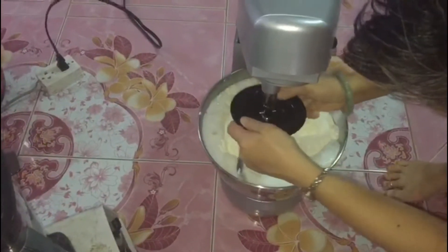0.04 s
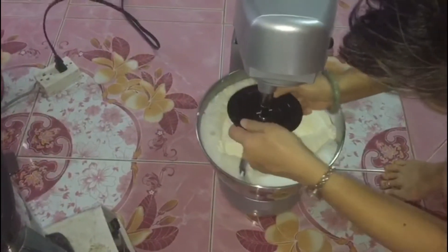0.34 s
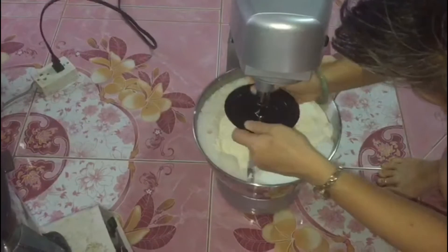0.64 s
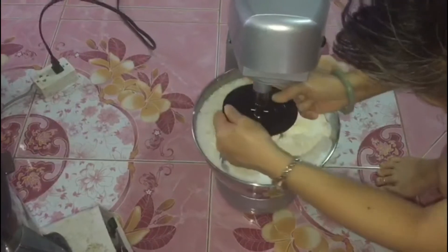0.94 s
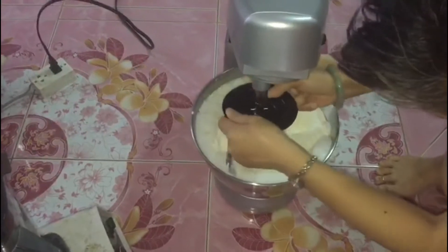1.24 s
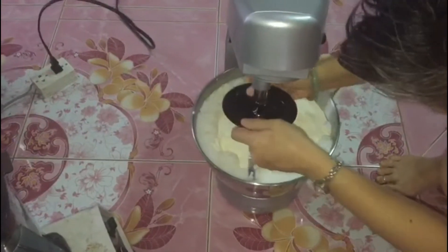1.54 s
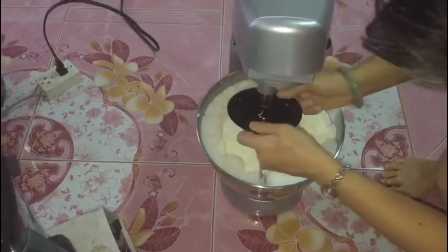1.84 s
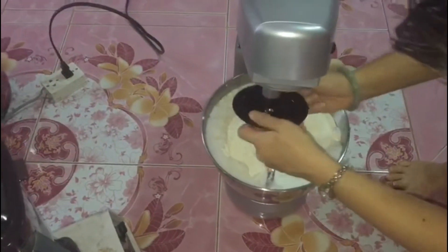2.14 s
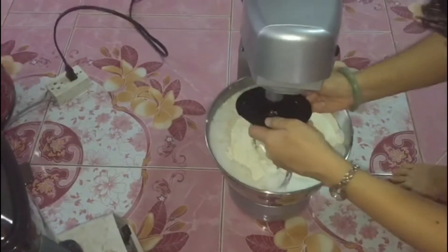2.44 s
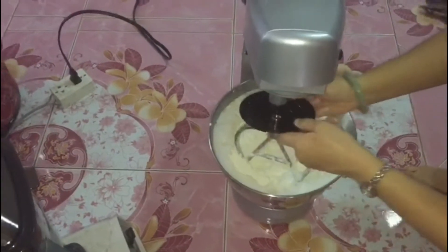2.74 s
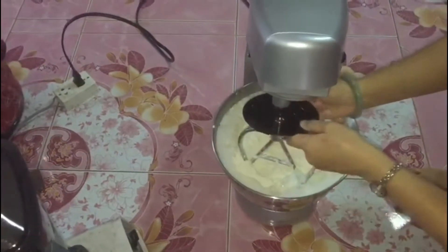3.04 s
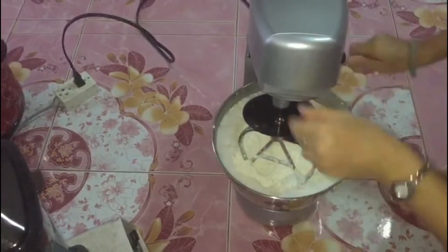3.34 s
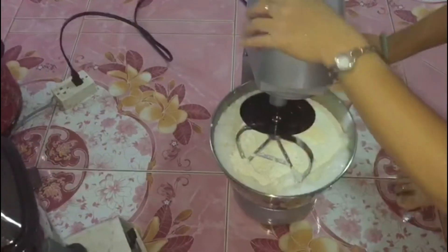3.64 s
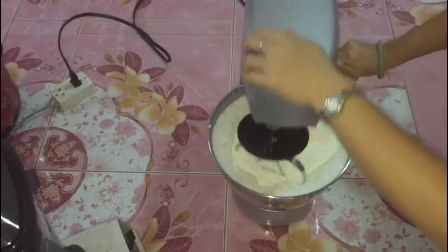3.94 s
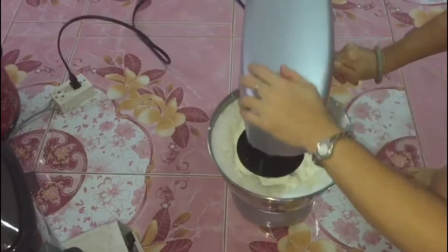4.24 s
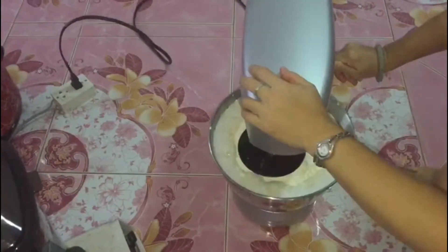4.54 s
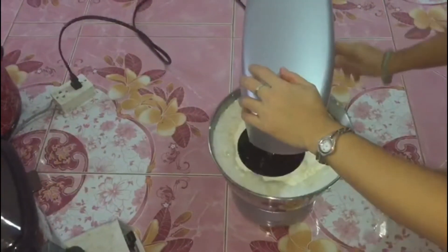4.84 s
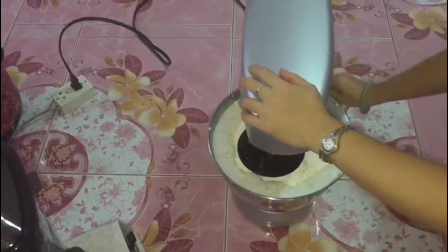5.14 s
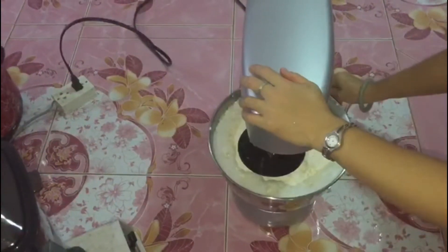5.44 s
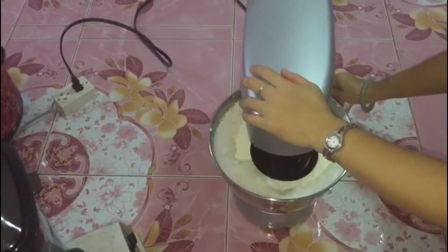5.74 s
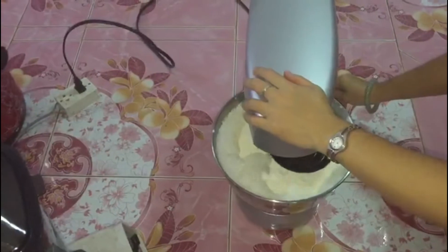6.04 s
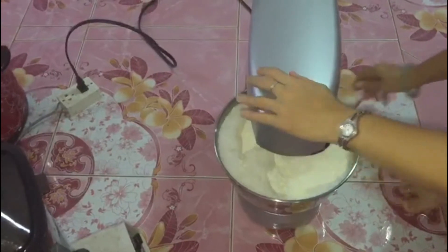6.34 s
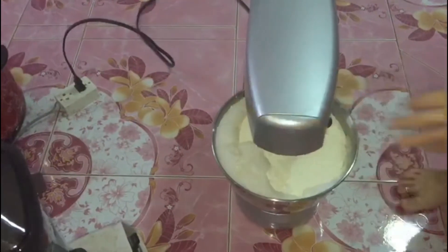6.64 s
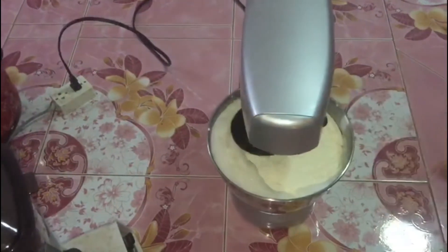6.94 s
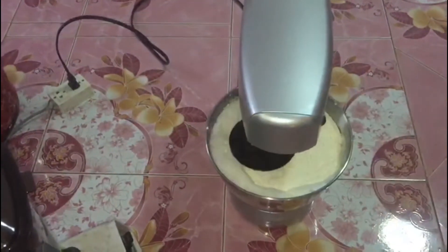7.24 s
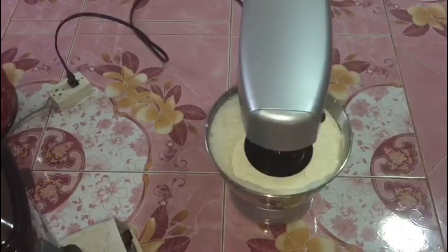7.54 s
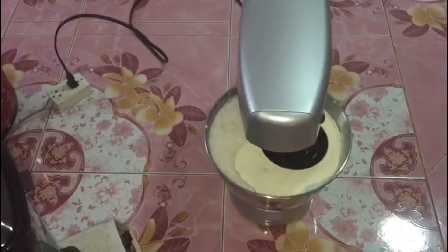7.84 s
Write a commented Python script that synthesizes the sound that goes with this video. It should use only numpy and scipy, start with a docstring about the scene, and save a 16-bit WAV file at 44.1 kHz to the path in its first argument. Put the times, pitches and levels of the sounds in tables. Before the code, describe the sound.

In a room with a tiled floor, close by, someone fits a beater onto a kitchen mixer with rubbing, loose metallic clicks and one sharp snap. The steel bowl rings briefly while a faint engine drones far away. The hinge groans, the head thuds down and its latch clunks. Then a switch clicks and the mixer jolts into a steady gear rattle and motor whine, kneading dough to the end.

```python
"""Setting up and starting a stand mixer

A beater scrapes, clicks and snaps onto its shaft, grazing a steel bowl in a room with a tiled floor.
The head is lowered on a groaning hinge and locks. The switch ticks, then the motor hisses and the
gears rattle and whine steadily. The room hums faintly, and an engine drones far away."""
import sys
import numpy as np
from scipy import signal
from scipy.fft import rfft, irfft, next_fast_len
from scipy.io import wavfile
from scipy.ndimage import map_coordinates

SR = 44100
rng = np.random.default_rng(int(sys.argv[2]) if len(sys.argv) > 2 else 0)


def log_audio(samples):
    """Write samples as a 16-bit WAV file to the path given in sys.argv[1]."""
    # one column per channel
    frames = np.atleast_2d(samples).T
    # limit to full scale, then quantise
    limited = np.clip(frames, -1, 1)
    pcm = np.round(limited * 32767).astype(np.int16)
    wavfile.write(sys.argv[1], SR, pcm)


N = 356769
TIME = np.arange(N) / SR
START_S, SPIN_UP_S = 5.51, .035   # when the motor starts, and how quickly it gathers speed
MAINS_HZ = 50

# The tone of the mixer's body under strain. Each row: frequency in Hz, relative level in dB.
CREAK = [(60, -37), (170, 2), (310, 5), (480, -5), (800, -5.5), (1500, -18), (4000, -34.5), (11000, -49)]


def from_db(db):
    """Turn decibels into a factor to multiply by."""
    return 10 ** (np.asarray(db) / 20)


def rms_one(x):
    """Scale a sound so that its average strength (rms) is 1."""
    return x / np.sqrt(np.mean(x ** 2) + 1e-20)


def at_hz(points, hz):
    """Read between the rows of a table, giving every octave equal room."""
    f, value = np.transpose(points)
    return np.interp(np.log(hz + 1e-9), np.log(f), value)


def band(x, low, high, order=2):
    """Keep the part of a sound between two frequencies in Hz."""
    return signal.sosfilt(signal.butter(order, [low, high], "band", fs=SR, output="sos"), x)


def drift(per_s):
    """A smooth random wobble of strength 1 that takes about per_s new values a second."""
    coarse = TIME[::20]
    curve = map_coordinates(rng.standard_normal(4096), [coarse * per_s], order=3, mode="wrap")
    return rms_one(np.interp(TIME, coarse, curve))


def settle(start_s, time_s):
    """Rise from 0 at the start and close in on 1."""
    return 1 - np.exp(-np.maximum(TIME - start_s, 0) / time_s)


def die_away(t, t60):
    """A fade that falls by 60 dB in t60 seconds, the ring time."""
    return np.exp(-np.log(1000) * t / t60)


def colour(x, spectrum, resonances=()):
    """Shape the tone of a sound with a broad curve and narrow peaks or dips, at strength 1."""
    size = next_fast_len(N)
    hz = np.arange(size // 2 + 1) * SR / size
    gain = from_db(at_hz(spectrum, hz))
    for centre, width, db in resonances:
        gain *= np.sqrt(1 + (from_db(db) ** 2 - 1) / (1 + (2 * (hz - centre) / width) ** 2))
    return rms_one(irfft(rfft(x, size) * gain, size)[:N])


def grains(per_s):
    """Tiny random impacts of uneven size."""
    return rms_one((rng.random(N) < per_s / SR) * rng.laplace(size=N))


def swells(pushes, rise_db_per_s=262):
    """The loudness of a series of pushes: each swells to its peak and fades at its own pace."""
    each_db = [db - np.maximum(rise_db_per_s * (s - TIME), fade * (TIME - s)) for s, db, fade in pushes]
    return from_db(np.max(each_db, axis=0))


def far_engine(idle_hz=89.2, pull_away_s=.72, climb_hz_per_s=6.4):
    """A far engine idles, then speeds up evenly; at first its octave booms in the room."""
    # Loudness of the engine's note and of its octave. Each row: time in seconds, level in dB.
    note_levels = [(0, -60), (.33, -48), (.44, -64), (.62, -40), (.74, -65), (.81, -71), (.88, -40),
                   (1.2, -37.5), (1.48, -44), (1.56, -52), (1.7, -44.5), (2.55, -44.5), (3, -55.5),
                   (3.4, -49.5), (3.8, -65.5)]
    boom_levels = [(.64, -48), (.74, -66.5), (.92, -53.5), (1.2, -51), (1.5, -81)]
    hz = idle_hz + climb_hz_per_s * np.maximum(TIME - pull_away_s, 0)
    phase = 2 * np.pi * np.cumsum(hz) / SR
    note = from_db(np.interp(TIME, *np.transpose(note_levels))) * np.sin(phase)
    boom = from_db(np.interp(TIME, *np.transpose(boom_levels)) + 3.4 * drift(17)) * np.sin(2 * phase)
    throttle = from_db(1.3 * drift(13))
    return np.sqrt(2) * throttle * (note + boom)


def room_tone(rumble_db=-53.5):
    """The room's faint steady hum and low rumble."""
    # Each row: frequency in Hz, level in dB (relative for the rumble).
    hum_tones = [(46.75, -58), (93.5, -52)]
    rumble = [(31, -37), (45, 4), (65, 3.5), (145, -10.5), (220, -1), (350, 2), (500, -13.5), (1000, -20.5),
              (2000, -27.5), (4000, -33), (11500, -40.5)]
    hum = sum(from_db(db) * np.sin(2 * np.pi * (hz * TIME + rng.random())) for hz, db in hum_tones)
    return np.sqrt(2) * hum + from_db(rumble_db) * colour(rng.standard_normal(N), rumble)


def add_room_echo(x, wet_db, build_s=0.0015):
    """Echoes off the tiles blur into a wash: each frequency band stores energy and lets it die away."""
    # How long the room rings. Each row: frequency in Hz, ring time in seconds.
    ring_times = [(150, 0.98), (500, 0.77), (2000, 0.9), (5000, 0.42), (11000, 0.14)]
    out, edges = x, np.geomspace(100, 12000, 15)
    noise = rng.standard_normal((2, N))
    build = np.exp(-1 / (build_s * SR))
    for k, (low, high) in enumerate(zip(edges, edges[1:])):
        keep = from_db(-60 / (at_hz(ring_times, np.sqrt(low * high)) * SR)) ** 2
        energy = signal.lfilter([1 - keep], [1, -keep], band(x + 1e-9 * noise[0], low, high) ** 2)
        energy = signal.lfilter([1 - build], [1, -build], energy)
        out = out + from_db(wet_db) * np.sqrt(energy) * rms_one(band(noise[k % 2], low, high))
    return out


def rubbing(squeak_from_s=1.64, squeak_to_s=1.86, squeak_db=-60.5):
    """The beater rubs and slides up its shaft, the shaft squeaks once, and hands brush the housing."""
    # Each row: time of the hardest push in seconds, level in dB, fade in dB per second.
    rubs = [(0, -43.5, 108), (.29, -42, 137), (.68, -42, 162), (1.17, -42.5, 172), (2.755, -51, 150)]
    slides = [(1.95, -36, 53)]
    hand_strokes = [(3.97, -46, 224), (4.2, -45, 80), (5.28, -46, 187)]
    # The tone of rubbing and of sliding. Each row: frequency in Hz, relative level in dB.
    friction = [(40, -25), (200, 14.5), (600, 6.5), (1000, -4.5), (1400, 2), (2200, -15), (3300, -9),
                (4600, -24), (6000, -19), (9500, -27), (11500, -44)]
    sliding = [(60, -19.5), (300, 11.5), (600, 1.5), (1100, 3), (2000, 0), (3100, -5.5), (4300, -14.5),
               (9500, -26.5), (11500, -45)]
    # Where the shaft and its socket sing. Each row: frequency in Hz, width in Hz, boost in dB.
    shaft = [(1026, 28, 16), (1520, 40, 5), (2000, 60, 8.5), (2330, 100, 13), (4620, 130, 13.5)]
    socket = [(1760, 94, 23), (4350, 140, 28)]
    rub = swells(rubs) * colour(grains(5300), friction, shaft)
    slide = swells(slides) * colour(grains(3300), sliding, shaft)
    hands = swells(hand_strokes) * colour(grains(3700), sliding)
    pressure = np.clip(np.minimum(TIME - squeak_from_s, squeak_to_s - TIME) / 0.075, 0, 1)
    squeak = from_db(squeak_db) * pressure * colour(grains(3700), friction, socket)
    return rub + slide + hands + squeak


def hinge():
    """The hinge groans as it takes the weight of the head."""
    # Each row: time of the greatest strain in seconds, level in dB, fade in dB per second.
    groans = [(3.87, -43.5, 121), (3.98, -42, 290.5), (4.28, -33.5, 118), (4.665, -38.5, 132)]
    return swells(groans, rise_db_per_s=209) * colour(grains(3500), CREAK)


def struck_notes(notes, t):
    """A part rings after one blow; the grip of the hands shifts each note's pitch and strength."""
    hz, db, t60 = np.transpose(notes)[:, :, None]
    hz = hz * (1 + .015 * rng.standard_normal(hz.shape))
    strength = from_db(db + 2 * rng.standard_normal(hz.shape)) * rng.choice([-1, 1], hz.shape)
    return np.sum(strength * die_away(t, t60) * np.sin(2 * np.pi * hz * t), axis=0)


def strikes(blows, notes, voice_db, loose=False, rebounds_per_s=180):
    """Each touch is a click and a brief scrape that set off a part's notes and a short rattle."""
    # The thud, knock, clack and tick bands. Each row: low edge in Hz, high edge in Hz.
    bands = [(150, 600), (600, 1300), (1300, 4000), (4000, 11000)]
    # A harder touch lifts the upper bands. Each entry: the share of the brightness that a band takes.
    bright_share = np.array([0.0049, 0, 0.39, 1])
    t = np.arange(SR // 4) / SR
    out, attack = np.zeros(N + len(t)), SR // 40
    rattle_fade = from_db(11) * die_away(t, 0.078) + from_db(12) * die_away(t, 0.015)
    for s, scrape_s, level_db, brightness, *_ in blows:
        band_db = level_db + np.array(voice_db) + brightness * bright_share
        touch = 0.0155 * rng.standard_normal(len(t)) ** 3 * np.exp(-(t / scrape_s) ** 2)
        touch[0] += (0.0052 / scrape_s) ** 2   # a glancing touch has less of a first click
        if loose:   # a loose part bounces at uneven moments
            rebounds = (rng.random(len(t)) < rebounds_per_s / SR) * rng.uniform(-1.3, 1, len(t))
            touch += from_db(-11) * np.linalg.norm(touch) * rebounds * np.exp(-t / 0.019)
        # a touch with little tick is a soft one, so it loses more treble
        clack_db, tick_db = band_db[2:]
        cutoff_hz = np.clip(2600 * from_db(.8 * (tick_db - clack_db + 24)), 2000, 12000)
        touch = signal.sosfilt(signal.butter(2, cutoff_hz, fs=SR, output="sos"), touch)
        body = struck_notes(notes, t) + rattle_fade * rng.standard_normal(len(t))
        blow = signal.fftconvolve(touch, body)[:len(t)]
        start = int(s * SR)
        for (low, high), db in zip(bands, band_db):
            part = band(blow, low, high, order=3)
            out[start:start + len(t)] += from_db(db) * part / np.std(part[:attack])
    return out[:N]


def ring_on(blows, notes):
    """Notes that outlast the blows: the harder the blow, the louder they ring."""
    clicks, out = np.zeros(N) + 1e-18, 0
    for s, _, level_db, *_ in blows:
        clicks[int(s * SR)] += from_db(level_db)
    for hz, db, t60 in notes:
        keep, angle = die_away(1 / SR, t60), 2 * np.pi * hz / SR
        ring = signal.lfilter([0, np.sin(angle)], [1, -2 * keep * np.cos(angle), keep ** 2], clicks)
        out = out + from_db(db) * band(ring, hz / 2, hz * 2)
    return out


def bowl():
    """The beater grazes the steel bowl, whose ring is damped by the dough."""
    # Each row: start in seconds, level in dB.
    taps = [(2.735, -42), (3.187, -58)]
    # The bowl's notes. Each row: frequency in Hz, relative level in dB, ring time in seconds.
    notes = [(1650, -6, 0.29), (1895, -2, .25), (1950, -1, 0.15), (2120, -4.5, 0.15), (2380, -17, 0.22)]
    return ring_on([(s, 0, db) for s, db in taps], notes)


def beater():
    """The loose beater knocks on its shaft and snaps over its catch; gives the blows and their ring."""
    # Each row: start in seconds, scrape time in seconds, base level in dB, brightness in dB
    # and, for the knocks only, relative level of the hollow ring in dB.
    knocks = [(.002, 0.03, -48, -15, -18), (.228, 0.042, -48.5, -35, 2.5),
              (0.2771, 0.00903, -39.5, 14.5, 3), (.289, .009, -37.5, -13, 0), (.604, 0.015, -44.5, -22, -9),
              (.628, 0.0095, -44, -12, -9), (.642, 0.0082, -32, -2, 1), (1.034, 0.0062, -49, -6, 4),
              (1.061, .008, -49.5, -15, 0), (1.079, 0.0045, -47.5, 8.5, 1), (1.105, 0.0068, -46.5, 1, -4),
              (1.145, 0.0054, -36.5, 4.5, -3), (1.606, 0.014, -39.5, -35, 2),
              (1.801, 0.0096, -50.5, -39, 6.5), (2.111, 0.0086, -42, -5, 7.5), (2.168, 0.012, -46, -17, 13),
              (2.248, 0.003, -32, 3.5, 6.5), (2.316, 0.0065, -42.5, -10, 4), (2.347, 0.0062, -34, -5, 2),
              (2.736, 0.0069, -40.5, -5, -13), (2.745, 0.011, -37, -18, 4), (3.188, 0.0061, -41, -19.5, 8)]
    snap = [(1.89, 0.017, -42, -6), (1.911, 0.019, -40.5, 17.5), (1.9228, 0.0049, -24, 6)]
    # Each list: dB added to the thud, knock, clack and tick.
    knock_voice = [-8, -1, -3, -15.5]
    snap_voice = [-7.5, 1, 2.5, -15]
    # Notes of the beater and shaft. Each row: frequency in Hz, relative level in dB, ring time in seconds.
    notes = [(225, -4.5, .2), (335, -6, .1), (555, -6, 0.039), (715, -2, 0.083), (806, 6, 0.055),
             (1140, 3.5, 0.028), (1614, 6, 0.059), (1942, 9.5, 0.028), (2303, 5, .05), (3480, -0.5, 0.014),
             (4800, -0.5, 0.022), (5660, 6.5, 0.04)]
    long_notes = [(865, -8.5, 0.28), (1160, -16, .28), (1550, -15, 0.26), (1870, -16, 0.22)]
    hollow_note = [(1012, 0, 0.0822)]
    shaft_notes = [(222.3, -5, 0.42), (278, -12.5, 0.87), (1047, -1.5, 0.22), (1894, 14.5, 0.047),
                   (2250, -13, 0.62), (2340, -14.5, .64), (2552, -17, .4), (4720, -22, 0.48),
                   (6130, -29, .5)]
    blows = strikes(knocks, notes, knock_voice, loose=True) + strikes(snap, notes, snap_voice, loose=True)
    hollow = [(s + scrape_s / 2, scrape_s, db + hollow_db) for s, scrape_s, db, _, hollow_db in knocks]
    ring = ring_on(knocks, long_notes) + ring_on(hollow, hollow_note) + ring_on(snap[-1:], shaft_notes)
    return blows, ring


def head():
    """The head clicks, lands on its stop and locks; gives the blows and the ring of base and latch."""
    # Each row: start in seconds, scrape time in seconds, base level in dB, brightness in dB.
    clicks = [(3.53, 0.0068, -66.5, -5), (3.638, 0.023, -49.5, -7), (3.662, 0.0034, -47.5, -2),
              (3.789, 0.018, -53.5, -26), (3.915, 0.008, -50.5, -13), (4.154, 0.0054, -48, -1.5),
              (4.252, 0.039, -39.5, -23), (4.6, 0.0092, -51, -14), (5.024, 0.0045, -86.5, 22.5),
              (5.241, 0.0059, -46.5, -12.5), (5.286, 0.0062, -58.5, 3.5), (5.326, 0.008, -62.5, -3),
              (5.555, 0.0031, -46.5, 2.5)]   # from the hand, tilt lever, speed knob and starting gears
    landing = [(4.2578, 0.0061, -30, -3.5)]
    locking = [(4.635, 0.0039, -33.5, -3.5)]
    # Each list: dB added to the thud, knock, clack and tick.
    click_voice = [-0.5, 1.5, 6, -5]
    landing_voice = [7, 0, -8, -13]
    locking_voice = [2, -2.5, -12, -19]
    # Notes of each part. Each row: frequency in Hz, relative level in dB, ring time in seconds.
    head_notes = [(182, -7, 0.17), (234, -8.5, 0.2), (282, -3, 0.16), (326, -5, 0.14), (443, -3, 0.074),
                  (611, -5.5, 0.041), (781, 1.5, 0.054), (920, 6, 0.035), (1234, -3.5, 0.098),
                  (1494, 6, 0.028), (1990, 8, 0.037), (3570, 4, 0.025)]
    base_notes = [(93.7, -2.5, 0.2), (188.4, -8.5, 0.72), (298, -5.5, 0.76), (443, -8, 0.14),
                  (660, 0, 0.064)]
    latch_notes = [(378, 1, 0.28), (562, 1, 0.16), (630, 6, 0.08), (836, -9, 0.37), (3800, -6, 0.062),
                   (3990, -18, .17)]
    blows = strikes(clicks, head_notes, click_voice)
    blows += strikes(landing, head_notes, landing_voice)
    blows += strikes(locking, head_notes, locking_voice)
    return blows, ring_on(landing, base_notes) + ring_on(locking, latch_notes)


def switch(at_s=5.4905, level_db=-32.0, decay_s=0.0058):
    """The contacts snap shut with a thin tick and sizzle until the motor takes over."""
    # The tone of the tick. Each row: frequency in Hz, relative level in dB.
    spectrum = [(200, -33.5), (700, 1), (1800, -1), (7000, -4), (10000, 6), (12000, -2)]
    age = np.maximum(TIME - at_s, 0)
    tick = np.exp(-age / decay_s)
    sizzle = from_db(-17) * (1 - settle(START_S, SPIN_UP_S))
    return (age > 0) * from_db(level_db) * (tick + sizzle) * colour(grains(25000), spectrum)


def brushes(load_db, level_db=-46.0, echo_s=0.02):
    """The motor's sparking brushes hiss, and echoes inside the housing ripple the sound."""
    # The tone of the hiss. Each row: frequency in Hz, relative level in dB.
    spectrum = [(2500, 1.5), (4400, 0.5), (6300, 5.5), (7900, -3), (9400, 0), (10400, -7.5), (11600, -13.5)]
    sparks_db = load_db + 1.5 * np.sin(2 * np.pi * MAINS_HZ * TIME) + 1.4 * drift(16)
    # now and then a gear tooth drops through its slack with a bright tick
    ticks = signal.lfilter([1], [1, -np.exp(-1 / (.004 * SR))], rng.random(N) < 9 / SR)
    hiss = grains(18000)
    t = np.arange(SR // 10) / SR
    echoes = rng.standard_normal(len(t)) * np.exp(-t / echo_s)
    hiss += from_db(3.5) * signal.fftconvolve(hiss, echoes / np.linalg.norm(echoes))[:N]
    return from_db(level_db) * colour(hiss * from_db(sparks_db + 10 * np.minimum(ticks, 1)), spectrum)


def tones(rows, cycles, waver):
    """Tones at multiples of one repeating motion, each wavering with the load."""
    out = 0
    for multiple, db in rows:
        phase = 2 * np.pi * (multiple * cycles + rng.random()) + waver * drift(6.1)
        out = out + np.sqrt(2) * from_db(db) * (1 + waver * drift(7.4)) * np.sin(phase)
    return out


def whine(turns, age, mesh_s=0.24):
    """The gears start to sing as their teeth settle together, and the chopped mains current buzzes."""
    # Each row: multiple of the gear wheel's turning rate, base level in dB.
    gear_tones = [(5.5, -53), (6, -41), (8, -45.5), (9.5, -52.5), (15, -47), (17, -48.5), (22, -49),
                  (25, -48), (31.5, -49.5)]
    ringing_tone = [(38.5, -47)]   # sits on a note of the housing and surges with the load
    # Each row: multiple of the mains frequency, base level in dB.
    motor_tones = [(4, -50), (10, -47), (12, -46)]
    singing = from_db(-1) * tones(gear_tones, turns, waver=.15)
    buzz = tones(motor_tones, MAINS_HZ * TIME, waver=0.29)
    surge = from_db(2 * drift(14) + 2.2 * age)
    ring = surge * tones(ringing_tone, turns + .02 * drift(45), waver=0.39)
    return settle(START_S, mesh_s) * (singing + ring) + buzz


def gear_rattle(turns, speed, load_db, level_db=-28.5, teeth=88, scatter=2.38):
    """Each gear tooth clicks and shakes the housing: its fit repeats every turn, its slack does not."""
    # The tone of the gears. Each row: frequency in Hz, relative level in dB.
    spectrum = [(100, -30), (160, -18.5), (185, -2.5), (335, -7), (400, -1), (700, -0.5), (1000, 2.5),
                (1250, -3), (1600, -8), (2600, -8.5), (3500, -12.5), (3780, -23), (4500, -29),
                (9000, -36.5)]
    # The housing's peaks and dips. Each row: frequency in Hz, width in Hz, boost or cut in dB.
    housing = [(290.3, 4.8, 14.5), (442.4, 14, 2), (1333, 51, 4), (1452, 52, 6.5), (1762, 62, 9),
               (1970, 31, 4), (2163, 72, 7.5), (2650, 99, 6), (2755, 106, -16), (2960, 61, 3.5),
               (4100, 98, 11.5)]
    fit, place = rng.standard_normal(teeth), rng.random(teeth)
    tooth = np.arange(int(turns[-1]) * teeth)
    hit_at = np.searchsorted(turns, (tooth + place[tooth % teeth]) / teeth)
    hit_size = fit[tooth % teeth] + scatter * rng.standard_normal(N)[:len(tooth)]
    clicks = rms_one(np.bincount(hit_at, hit_size, N + 1)[:N]) + 0.3 * rng.standard_normal(N)
    rattle = colour(clicks * from_db(load_db / 2), spectrum, housing)
    rattle /= np.std(rattle[speed > .5])
    # each panel of the housing, one band here, rattles harder or softer as the load shifts
    out, edges = rattle, np.geomspace(150, 4800, 7)
    for low, high in zip(edges, edges[1:]):
        out = out + (from_db(1.5 * drift(24)) - 1) * band(rattle, low, high)
    return from_db(level_db) * out


def mixer(wheel_hz=45.47, drone_hz=106.3, slack_s=0.0017, bite_s=0.011, growth_db_per_s=0.5):
    """The motor starts with a jolt and drives the gears, growing louder as the dough stiffens."""
    age = np.maximum(TIME - START_S, 0)
    speed = settle(START_S, SPIN_UP_S) * (1 + .003 * drift(5))
    turns = np.cumsum(speed) * wheel_hz / SR
    # rattle and hiss swell where the gear wheel runs tight once a turn
    load_db = 1.75 * (np.cos(2 * np.pi * turns) + np.cos(4 * np.pi * turns))
    drive = gear_rattle(turns, speed, load_db) + brushes(load_db) + whine(turns, age)
    drone = speed * tones([(1, -49.5)], drone_hz * TIME, waver=0.4)
    # the first twist takes up the slack and shakes the body
    jolt = settle(START_S, bite_s / 2) * from_db(-31.5) * np.exp(-age / 0.092)
    running = settle(START_S + slack_s, bite_s) * from_db(growth_db_per_s * age)
    return jolt * colour(grains(4000), CREAK) + running * (drive + drone)


def scene():
    """The handling, the running mixer and the background, in one channel."""
    beater_blows, beater_ring = beater()
    head_blows, head_ring = head()
    blows = add_room_echo(beater_blows + head_blows, wet_db=-13.5)
    handling = blows + beater_ring + head_ring + bowl() + rubbing() + hinge()
    return (handling + switch() + mixer() + far_engine() + room_tone())[None]


def record(dry):
    """Cut the treble steeply above 11900 Hz."""
    return signal.sosfilt(signal.ellip(10, .2, 70, 11900, fs=SR, output="sos"), dry)


dry = scene()
out = record(dry)
log_audio(out)
```